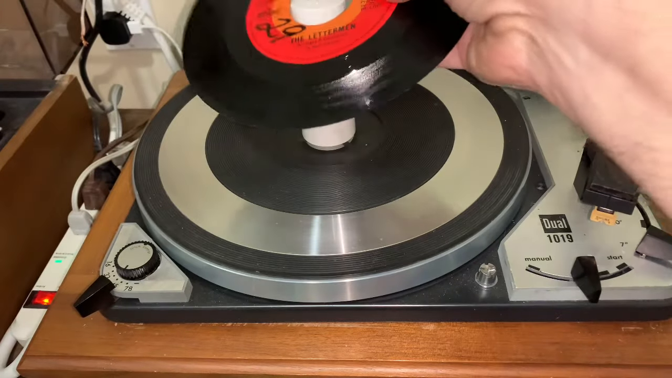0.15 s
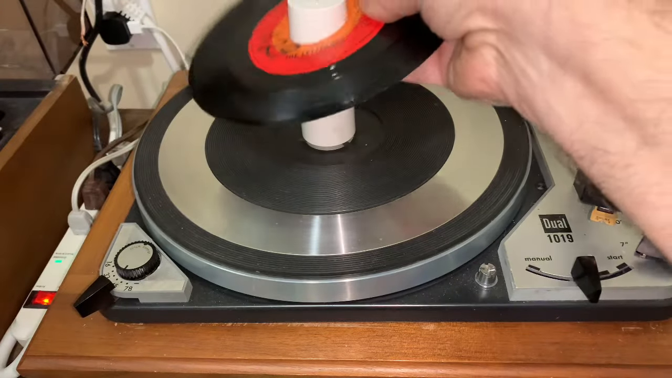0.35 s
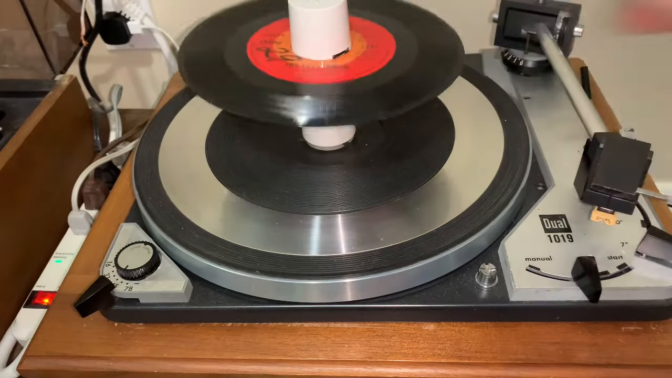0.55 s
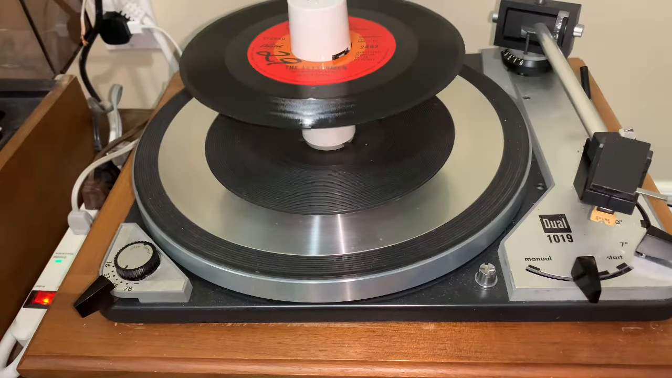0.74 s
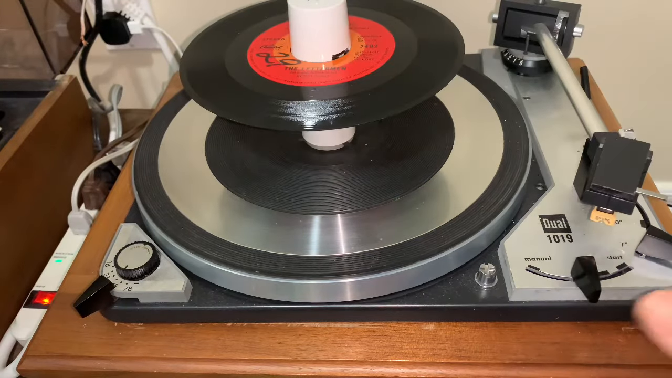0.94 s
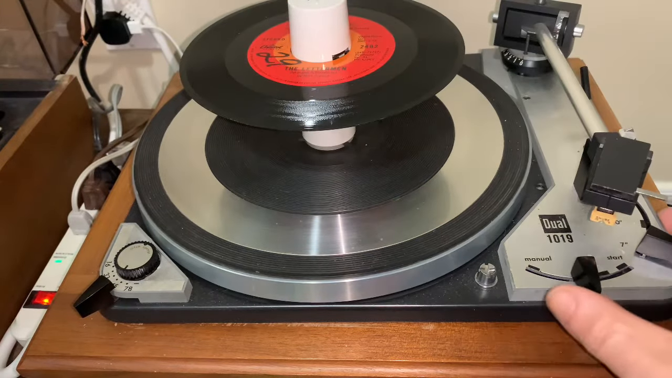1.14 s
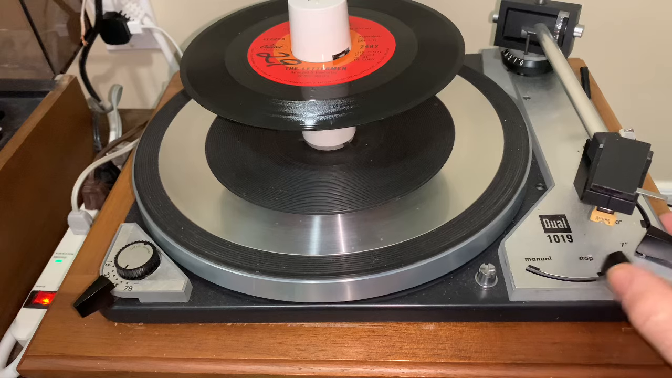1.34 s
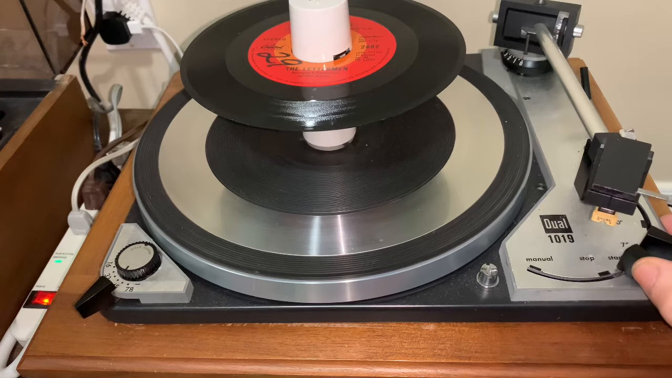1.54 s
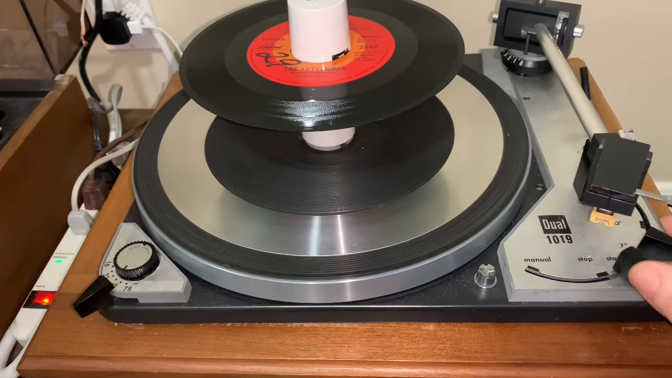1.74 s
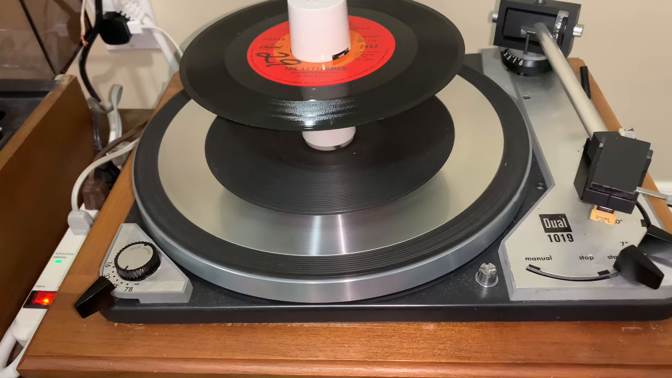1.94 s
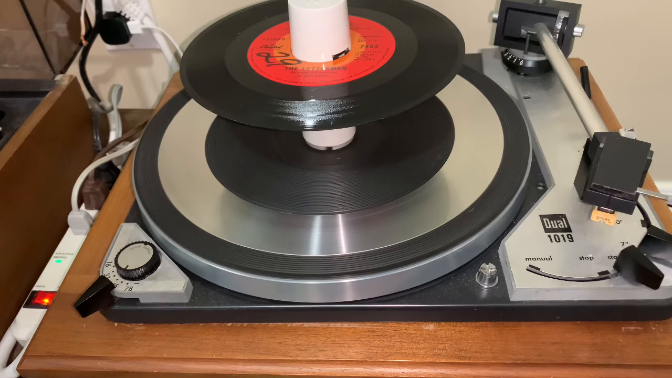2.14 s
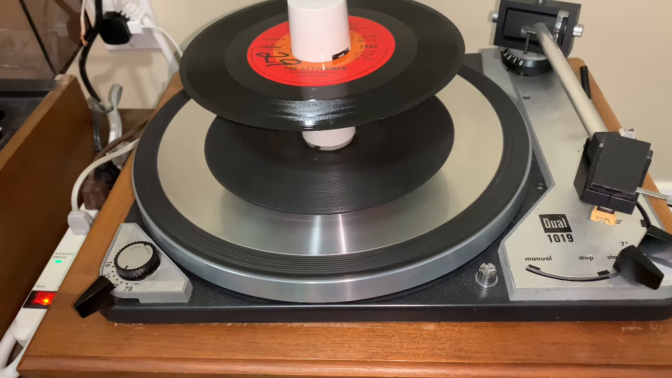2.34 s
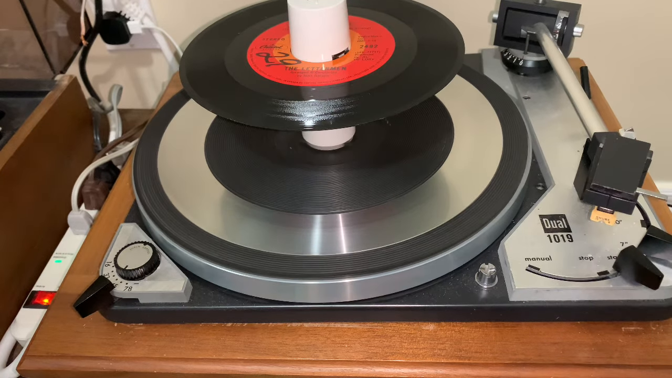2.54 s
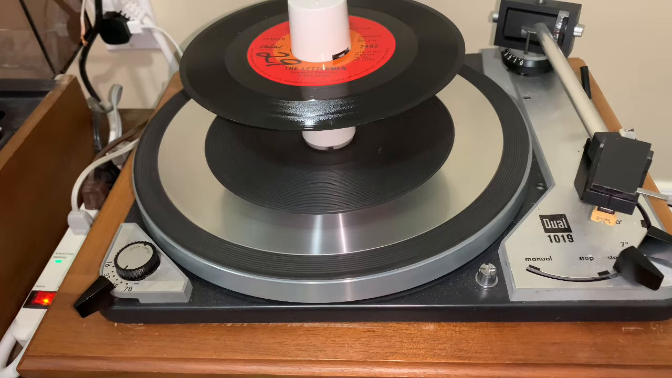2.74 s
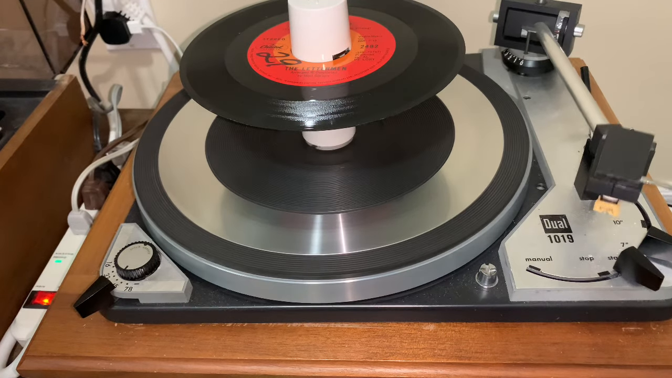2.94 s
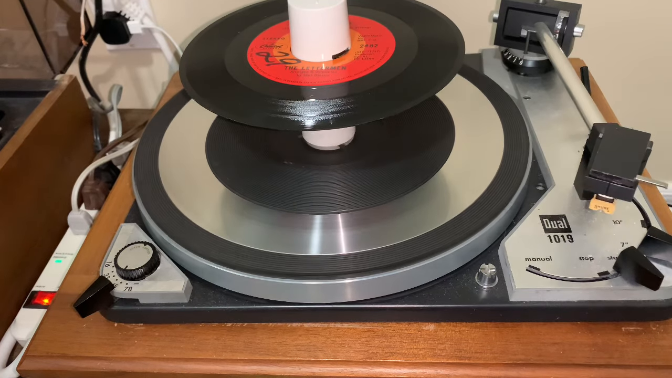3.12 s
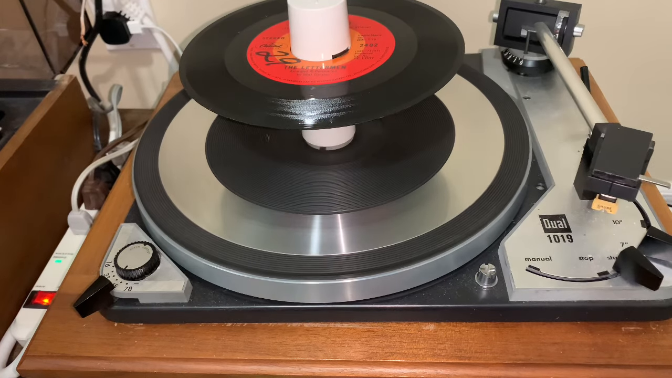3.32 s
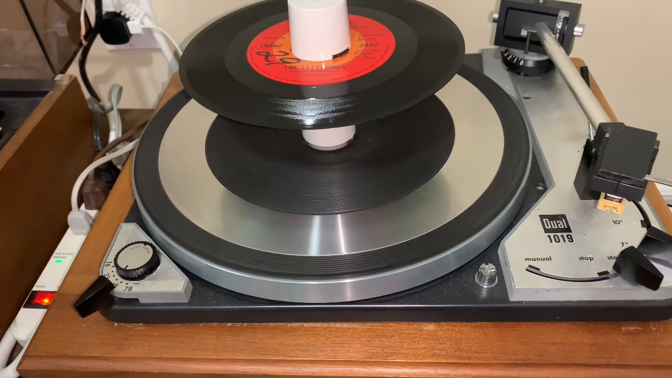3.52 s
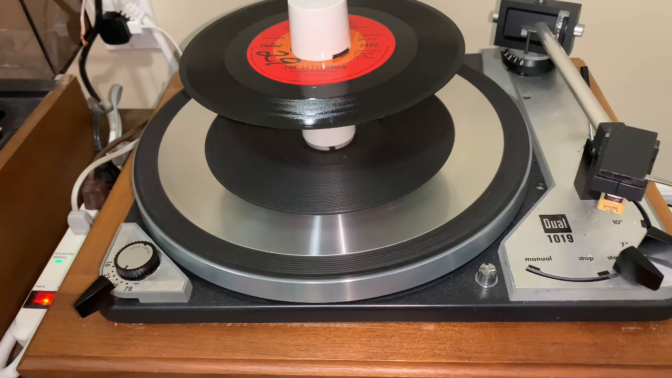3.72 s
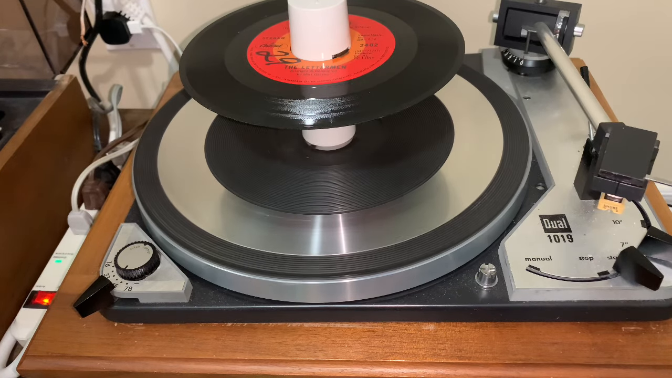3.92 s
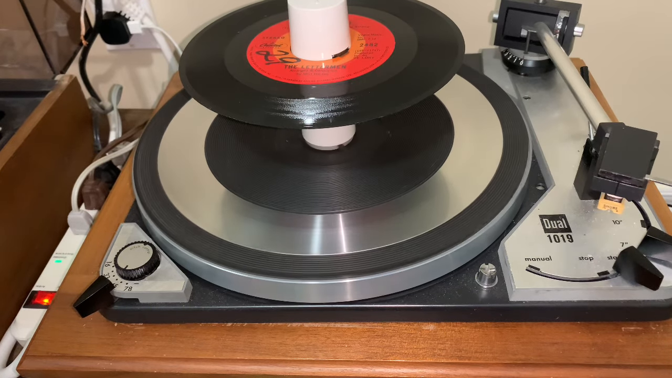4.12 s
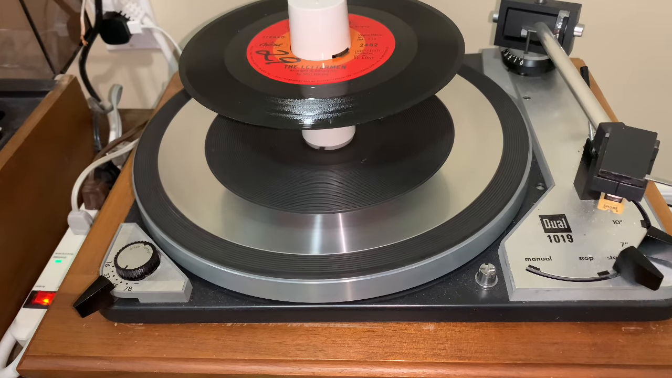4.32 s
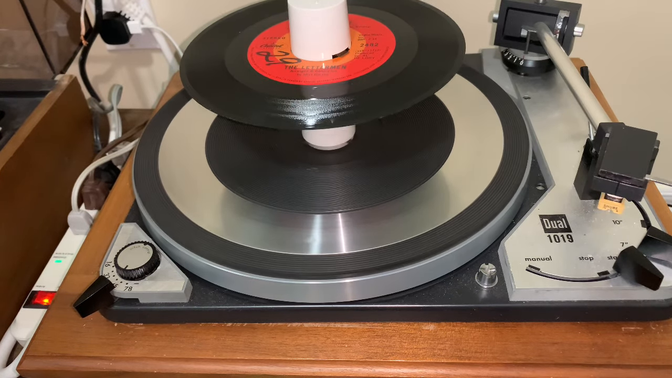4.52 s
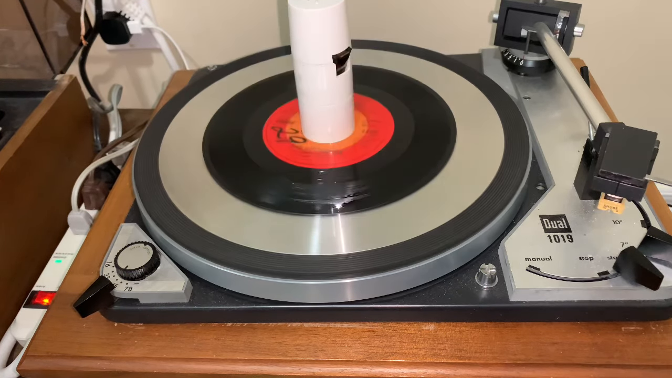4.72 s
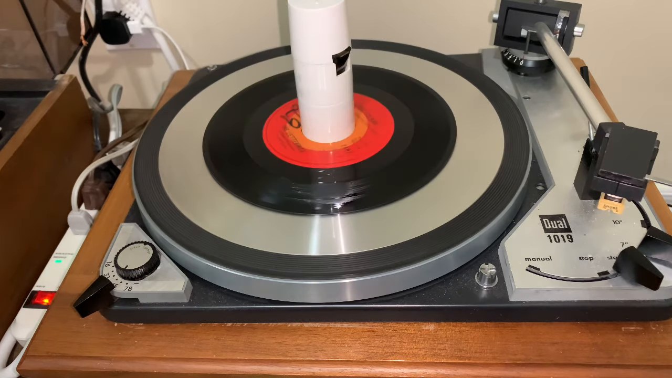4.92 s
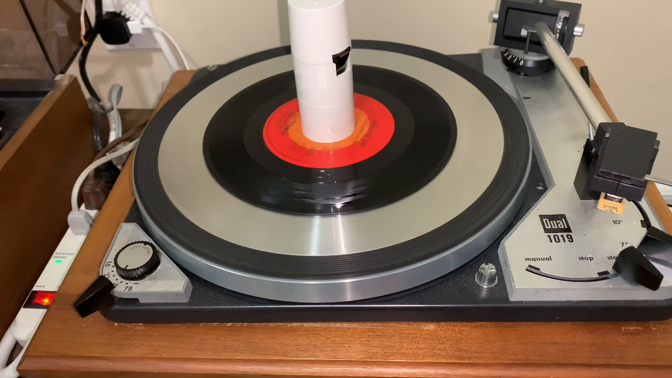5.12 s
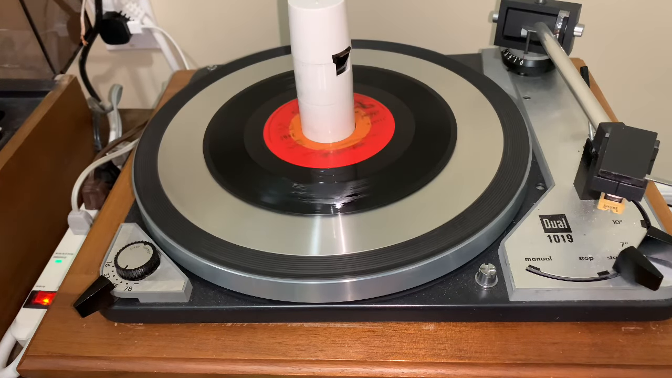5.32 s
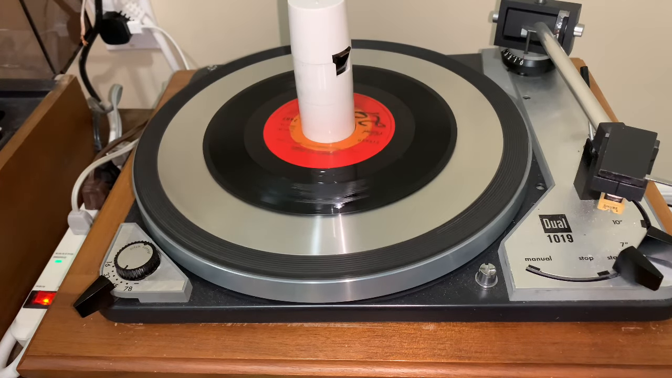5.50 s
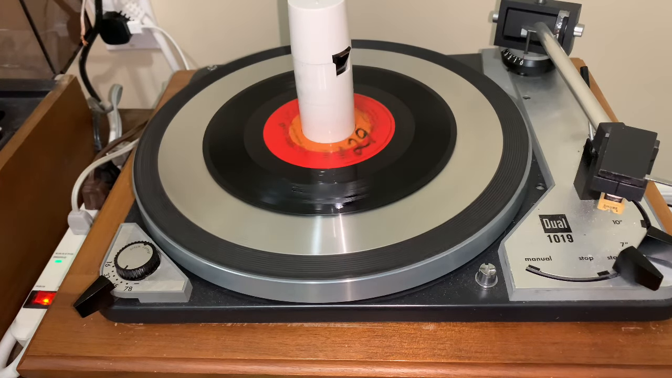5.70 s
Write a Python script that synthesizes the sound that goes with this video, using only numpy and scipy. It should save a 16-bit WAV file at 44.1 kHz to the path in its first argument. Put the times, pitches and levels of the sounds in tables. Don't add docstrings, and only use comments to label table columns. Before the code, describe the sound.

Close up in a small furnished room, a thin vinyl disc taps and wobbles onto a thick spindle with light finger rubbing. A start lever then snaps over with loud, ringing metal clacks. Faint greasy rubbing and small ticks follow until the latch trips sharply and the disc slaps flat onto the platter, rattling the deck. A few faint ticks and a muffled knock end it over low room rumble. Phone stereo microphone.

```python
import sys
import numpy as np
from scipy import signal
from scipy.fft import rfft, irfft, next_fast_len
from scipy.io import wavfile
from scipy.ndimage import uniform_filter1d, map_coordinates

SR = 44100
rng = np.random.default_rng(int(sys.argv[2]) if len(sys.argv) > 2 else 0)


def master(y):
    cut = np.clip(np.atleast_2d(y).T, -1, 1)
    pcm = np.round(cut * 32767)
    wavfile.write(sys.argv[1], SR, pcm.astype(np.int16))


def ratio_of_db(decibels):
    return 10 ** (np.asarray(decibels, float) / 20)


N = 258413
T = np.arange(N) / SR
FAST = next_fast_len(N)

# time_s, level_db
RUMBLE_STRENGTH = [(0.0, -63.5), (0.78, -55), (0.98, -66.5), (1.16, -63), (1.34, -55.5), (1.66, -59.5),
                   (2.15, -64), (3.28, -61), (3.83, -71.5), (4.11, -71), (4.78, -62), (4.99, -58.5),
                   (5.11, -68), (5.24, -56), (5.5, -99), (5.86, -64)]
# pitch_hz, drift_share, level_db (against the rumble), surge_db, surge_rate_hz
RUMBLE_TONES = [
    (65.5, .2, -6, 3.5, 24),
    (116.6, 0.12, -3, 4.5, 14),
    (179.7, .015, -6.5, 2.5, 5.9),
]
# frequency_hz, density_db (per Hz)
AIR_SPECTRUM = [(22, -26), (45, -4.5), (115, -5), (200, -10.5), (290, -23), (1200, -35.5), (7500, -46),
                (10000, -71)]
AIR_DB, HISS_DB = -65, -85.5

# start_s, length_s, pressure_db, drag_db (weight below 2 kHz), skid_db (sheen above 7.5 kHz)
RUB_STROKES = [(-.05, 0.17, -71.5, -6.5, -11), (0.175, 0.24, -69, -2.5, -11.5), (0.317, .2, -70, -3, 8),
               (0.422, 0.34, -76, 14.5, -22), (0.497, 0.18, -71.5, 3, -11.5),
               (2.187, .33, -66.5, -4.5, -12.5), (2.334, 0.49, -78.5, 13.5, -9),
               (2.756, 0.55, -73.5, 1, -1), (3.109, 0.48, -67, -2, -6.5), (3.447, 0.57, -90, 4, -5),
               (4.184, 0.29, -74.5, -11, -23.5), (5.201, 0.22, -93.5, 10, 6.5)]
STROKE_RISE, STROKE_FALL, STROKE_SOFT_DB = 0.39, 0.65, 19.5
# pitch_hz, level_db, t60_s
HELD_DISC = [(761, -6.5, 0.06), (1180, -8.5, 0.27), (1285, -1.5, 0.21), (1529, 5, 0.025), (2600, -3, 0.11)]
HELD_RING_DB, SEATED_S = -25, 1.1

# start_s, length_s, pitch_hz, level_db, scatter_hz
SINGING_PARTS = [(.01, 0.082, 2200, -69, 370), (2.88, 0.046, 1703, -80.5, 3.4),
                 (2.937, 0.12, 362.8, -67.5, 20.4), (3.37, 0.094, 1313, -70, 77),
                 (3.409, 0.18, 414.4, -76.5, 26), (3.649, 0.093, 1316, -67, 11.4),
                 (5.196, 0.17, 4210, -71.5, 540), (.532, 0.041, 684, -51.5, 6.7),
                 (.592, .055, 684, -50, 6.6), (.618, 0.022, 1270, -54, 19), (.302, 0.037, 350, -49.5, 12),
                 (.43, 0.054, 690, -65, 5.8), (.685, 0.041, 670, -58.5, 11.6),
                 (1.461, 0.086, 683, -44.5, 12), (4.354, .14, 1243, -54, 26.8), (4.567, .1, 790, -47, 10),
                 (4.95, .2, 2155, -74.5, 136), (1.793, 0.054, 327.6, -52.5, 65.4)]

# time_s, peak_db (1-3 kHz), thud_db (relative), brightness_db (relative), ring_hz
VINYL_CONTACTS = [(0.1547, -48, 4.5, -2, 264), (0.187, -49.5, 7, -3.5, 252), (0.2647, -71, 20, -24, 376),
                  (0.2823, -55, 1, -5, 393), (0.3022, -51, 8.5, -10, 338), (0.3495, -44.5, -15, -5.5, 1090),
                  (0.4278, -61.5, 1, 2, 694), (0.4673, -50, -5, 3, 1270), (0.4774, -46.5, -1, -1.5, 322),
                  (0.5291, -35.5, -4, -2.5, 680), (0.5875, -42.5, 3.5, 6, 694), (0.619, -45, -3, -27, 1286),
                  (0.6894, -54.5, 1, -29, 665), (0.752, -61.5, 0.5, -17, 364),
                  (0.7991, -69, -3.5, -13, 1270)]
LEVER_CONTACTS = [(1.1975, -58, -12.5, -16, 724.4), (1.2181, -37.5, -21.5, -11.5, 1695),
                  (1.2314, -62, -1.5, -14.5, 678), (1.2674, -59.5, -7.5, 3.5, 1007),
                  (1.3048, -30, -20, -10.5, 2933), (1.3247, -45, 4.5, 4, 658),
                  (1.3563, -13.5, -24.5, -5, 2983), (1.3624, -17.5, -15.5, -5.5, 2600),
                  (1.3825, -28, -9, -7, 2047), (1.4367, -40, -13, 3.5, 2410),
                  (1.4663, -20.5, -16, 0.5, 3497), (1.4773, -15, -20, -8, 664),
                  (1.7509, -25, -17.5, -14, 2418), (1.8044, -62.5, -19, -18, 300),
                  (1.346, -45, -11, -3, 2810),
    (1.457, -43, -11, 1, 3110),
    (1.744, -41, -16, 1, 1610),
    (1.3525, -24, -18, 2, 2400),
]
TRIP_CONTACTS = [
    (4.3605, -32, 5.5, 0, 398.8),
    (4.3668, -39.5, 0.5, -16.5, 646),
    (4.5585, -13.5, -17, -4, 2309),
    (4.5703, -20, -7, -5, 771),
    (4.5992, -25.5, -9, -8, 694),
    (4.6777, -25.5, -11, -9, 438),
    (4.6875, -28.5, -2.5, -7.5, 916),
                 (4.546, -50, -21, -9, 4510),
    (4.5545, -32, -16, 4, 2310),
    (2.266, -63, -16, -2, 1110),
    (3.263, -64, -16, 0, 2010),
]
CAM_TICKS = [(2.3647, -41.5, -7, 6.5, 1320), (2.3726, -44, -4, 4.5, 1050), (2.6703, -50, -10, 4, 2380),
             (2.6784, -47.5, -0.5, 6.5, 1610), (2.9345, -46, -26, -0.5, 2800),
             (2.9385, -45.5, -29, -1.5, 1617), (4.055, -68, -7.5, -10, 1482),
             (4.1455, -65.5, -8.5, 3.5, 2420), (4.2663, -60, -18.5, 3, 2230), (4.354, -24, -10, -5.5, 1480),
             (4.9415, -39.5, -28, 0, 2397), (4.946, -35.5, -23, -0.5, 1720), (5.2617, -64.5, -14, 9, 1704),
             (5.6236, -57, -16, -3.5, 1653)]
CAM_KNOCKS = [
    (2.6334, -49, -2.5, -11, 1220),
    (2.7616, -55, -25, -30, 1054),
    (3.6541, -69, 10.5, 1, 1330),
    (4.3286, -50.5, 3, 6, 1267),
    (4.9514, -52, 8.5, -5.5, 1028),
    (5.7134, -71, 5, -22, 1329),
    (5.7972, -43, -11.5, -46, 771),
    (5.8144, -55, 3, -35, 1100),
    (5.8294, -69.5, 7, -26, 711),
]
DROP_BOUNCES = [
    (4.6715, -24, -1.5, 4, 950),
    (4.6735, -29, -4, 3.5, 2240),
    (4.6765, -25.5, -6, 2.5, 1920),
    (4.6785, -17.5, -9.5, 2.5, 2040),
    (4.6845, -21, -4, -1.5, 1180),
    (4.69, -24.5, -2.5, 1, 500),
    (4.6955, -25.5, -5, 1, 1560),
    (4.705, -30, -13.5, -2, 2485),
]
SNAP_S, SNAP_DB, SNAP_LEN_S = 4.6786, -10.5, .00006
MAT_HOLE_HZ = 3000
TOP_FOLLOWS = 1
# time_s, level_db
PLATTER_BLOWS = [
    (4.675, -39),
    (4.679, -25),
    (4.686, -38),
]

# pitch_hz, level_db, t60_s
VINYL_MODES = [(230, 4, .1), (300, -1, .08), (360, -1, .07), (415, -12, .1), (684, 0, .14), (1100, -6, .08),
               (1180, -5, .12), (1280, -3, .2), (1450, -7, .08), (2500, -12, .05), (3680, -10, .08),
               (6300, -5, .07), (6900, -6, .05)]
# pitch_hz, level_db, t60_s
LEVER_MODES = [(330, -10, .12), (412, -11, .2), (675, 2, .18), (788, -3, .15), (1050, -7, .12),
               (1650, -5, .12), (2061, -9, .12), (2830, -6, .12), (3415, -4, .15), (3700, -7, .1),
               (4500, -8, .08), (5310, -4, .14), (6820, -8, .08), (10970, -6, .08)]
# pitch_hz, level_db, t60_s
CAM_MODES = [(415, -5, .25), (789, 2, .18), (922, -4, .18), (1050, -5, .15), (1180, -3, .18),
             (1316, -4, .18), (1685, -3, .12), (2100, -1, .13), (2360, -3, .13), (3470, -5, .1),
             (3800, -4, .08), (4370, -2, .07), (5080, -5, .1), (6500, -6, .07)]
# pitch_hz, level_db, t60_s
PLATTER_MODES = [(60.7, -8.5, 0.13), (89.3, 7, 0.09), (117.5, -6.5, 0.047), (193.4, 1.5, 0.15),
                 (257, -10, 0.076), (416, 6.5, 0.11), (496.4, 9, 0.046)]
# pitch_hz, level_db, t60_s
SHEEN_MODES = [(8800, -4, 0.35), (9855, -6.5, 0.08), (11080, -2.5, 0.077), (12300, -5, 0.17),
               (13900, -7.5, .12), (14800, -3.5, .15), (15290, -2.5, .12)]
LEVER_BODY_DB, CAM_BODY_DB, SHEEN_DB = -31, -33.5, -35.5

# frequency_hz, t60_s
CLATTER_DECAY = [(200, 0.66), (500, 0.083), (1200, 0.086), (3000, 0.26), (6000, .2), (9000, .2),
                 (14000, 0.12)]
# frequency_hz, t60_s
ROOM_DECAY = [(200, 0.82), (500, 0.5), (1200, 0.76), (3000, 0.63), (6000, 0.53), (10000, 0.18),
              (15000, 0.4)]
SWAY_S = .00009

# frequency_hz, likeness (0-1)
PORT_ALIKE = [(100, 0.87), (400, 0.8), (800, 0.07), (1500, 0.5), (3000, 0.2), (5500, 0), (6800, .75),
              (9000, 0.89)]
# frequency_hz, left_minus_right_db
PORT_LEAN = [(300, 0), (1200, 2.5), (2500, 1), (5000, -3.5), (7000, -2), (9000, 0)]
# frequency_hz, level_db
CAPSULE_COLOUR = [(2000, 0.5), (4200, 4), (6300, 2), (7800, -1.5), (9500, 4.5), (12500, -1.5),
                  (15700, -4.5), (16300, -17.5)]
PORT_TURN_HZ, PORT_ALIGNED_HZ, TOP_HZ = 4700, 11000, 16450


def on_log(table, hz):
    points_hz, values = np.transpose(table)
    return np.interp(np.log(hz + 1), np.log(points_hz), values)


def band(x, lo_hz, hi_hz):
    sos = signal.butter(4, [lo_hz, min(hi_hz, .45 * SR)], "bandpass", fs=SR, output="sos")
    return signal.sosfilt(sos, x) * np.sqrt(SR / 2 / (hi_hz - lo_hz))


def walk(rate_hz):
    step = int(SR / rate_hz)
    held = np.repeat(rng.standard_normal(N // step + 1), step)
    return 1.3 * uniform_filter1d(uniform_filter1d(held, step), step)[:N]


def ring(x, modes, rough):
    out, waver = 0, walk(190)
    for k, (hz, db, t60) in enumerate(modes):
        radius = np.exp(-np.log(1000) / (np.clip(.65 * t60, .01, .35) * SR))
        w = 2 * np.pi * hz / SR
        mode = np.sin(w) * signal.lfilter([1], [1, -2 * radius * np.cos(w), radius * radius], x)
        own_waver = np.roll(waver, k * SR // 3)[:x.shape[-1]]
        out = out + ratio_of_db(db) * mode * (1 - rough + rough * own_waver)
    return out


def tail(t60_table, onset_s):
    t = T[:SR]
    hz = np.fft.rfftfreq(SR, 1 / SR)
    noise, out = rfft(rng.standard_normal((2, SR))), 0
    for centre_hz in 60 * 2 ** np.arange(0, 8.6, .5):
        share = np.clip(1 - 2 * np.abs(np.log2((hz + 1) / centre_hz)), 0, 1)
        out = out + irfft(noise * share) * ratio_of_db(-60 * t / on_log(t60_table, centre_hz))
    out = out * (1 - np.exp(-t / onset_s))
    return out / np.sqrt(np.sum(out ** 2, axis=1, keepdims=True))


def contacts(hits, modes, reach_hz, rise_s, fall_s, body_db, note_db, note_t60, top_db):
    size = SR // 8
    start = int((min(hits)[0] - .02) * SR)
    span = min(int(max(hits)[0] * SR) + SR // 2, N) - start
    t = T[:size]
    slow = np.array([1.4, 0.99, 1.0, 0.66])[:, None, None]
    build = np.minimum(t / (rise_s * slow), 1) ** 2
    shape = build * np.exp(-np.maximum(t / slow - rise_s, 0) / fall_s)
    shape_energy = np.sum(shape ** 2, axis=2)
    parts, notes = np.zeros((4, 2, span + size)), np.zeros((2, span + size))
    for s, db, thud_db, bright_db, hz in hits:
        i = int((s - rise_s / 2) * SR) - start
        grit, uneven, jitter = rng.standard_normal((3, 2, size))
        rattle = shape * grit * ratio_of_db(10 * uniform_filter1d(uneven[0], size=9))
        rattle *= np.sqrt(shape_energy / np.sum(rattle ** 2, axis=2))[:, :, None]
        levels = db + np.array([thud_db, 0, bright_db, top_db + TOP_FOLLOWS * bright_db])
        parts[:, :, i:i + size] += ratio_of_db(levels)[:, None, None] * rattle
        phase = 2 * np.pi * hz * t + (hz / 6000) ** 1.5 * np.cumsum(jitter, axis=1)
        fade = ratio_of_db(db + thud_db * (hz < 1000) + note_db - 60 * t / note_t60)
        notes[:, i:i + size] += fade * np.sin(phase) * np.minimum(t / rise_s, 1)
    edges = [(reach_hz[0], 1000), (1000, reach_hz[1]), (reach_hz[1], 7500), (7500, 16500)]
    crack = 0
    for part, (lo_hz, hi_hz), db in zip(parts, edges, (-8.5, -10.5, -5.0, 5.0)):
        crack = crack + ratio_of_db(db) * band(part[:, :span], lo_hz, hi_hz)
    out = np.zeros((2, N))
    out[:, start:start + span] = crack + ratio_of_db(body_db) * ring(crack, modes, rough=0.66) + notes[:, :span]
    return out


def house():
    strength_db = np.interp(T, *np.transpose(RUMBLE_STRENGTH))
    hum = 0
    for hz, drift, db, surge_db, rate_hz in RUMBLE_TONES:
        pitch = hz * (1 + drift * np.array([walk(8.2), walk(7)]))
        gain = ratio_of_db(strength_db + db + surge_db * walk(rate_hz) + 4.5 * walk(30))
        hum = hum + gain * np.sin(2 * np.pi * np.cumsum(pitch, axis=1) / SR)
    colour = ratio_of_db(on_log(AIR_SPECTRUM, np.fft.rfftfreq(FAST, 1 / SR)))
    air = irfft(rfft(rng.standard_normal((2, FAST))) * colour, FAST)[:, :N]
    hiss = band(rng.standard_normal((2, N)), 7000, 16000)
    return hum + ratio_of_db(AIR_DB + 2.7 * walk(4.3)) * air / air.std() + ratio_of_db(HISS_DB) * hiss


def rubbing():
    out = np.zeros((2, N))
    grains = rng.standard_normal((2, N)) * ratio_of_db(1.8 * walk(300) + 1.2 * walk(30))
    body = band(grains, 2400, 7300)
    drag = band(grains, 450, 2400)
    skid = band(grains, 7500, 16500)
    for s, length, db, drag_db, skid_db in RUB_STROKES:
        on = slice(max(int(s * SR), 0), int((s + length) * SR))
        at = (T[on] - s) / length
        press = np.clip(np.minimum(at / STROKE_RISE, (1 - at) / STROKE_FALL), 0, 1)
        gain = ratio_of_db(db - STROKE_SOFT_DB * (1 - press) ** 2) * np.minimum(10 * press, 1)
        out[:, on] += gain * (body[:, on] + ratio_of_db(drag_db) * drag[:, on] + ratio_of_db(skid_db) * skid[:, on])
    out = out * ratio_of_db(3.1 * walk(9))
    early = int(SEATED_S * SR)
    out[:, :early] += ratio_of_db(HELD_RING_DB) * ring(out[:, :early], HELD_DISC, rough=0.48)
    return out


def springs():
    out, shiver = 0, np.array([walk(630), walk(1000)])
    for s, length, hz, db, scatter_hz in SINGING_PARTS:
        speak = np.clip((T - s) / (0.00089 + scatter_hz / 6900.0), 0, 1)
        damp = np.clip((s + length - T) / 0.052, 0, 1)
        phase = 2 * np.pi * np.cumsum(hz + scatter_hz * shiver, axis=1) / SR
        level_db = db + 8.5 - 45 * np.clip(T - s, 0, 1) + scatter_hz / 300 * shiver[::-1]
        out = out + ratio_of_db(level_db) * speak * damp * np.sin(phase)
    return out


def vinyl_knocks():
    return contacts(VINYL_CONTACTS, VINYL_MODES, (300, 1700), rise_s=0.0019, fall_s=0.0041,
                    body_db=-25.5, note_db=-2.5, note_t60=0.066, top_db=-6.0)


def clatter_and_room(shaken, vinyl):
    clatter = signal.fftconvolve(shaken, tail(CLATTER_DECAY, 0.0054), axes=1)[:, :N]
    room = signal.fftconvolve(shaken + 0.38 * vinyl, tail(ROOM_DECAY, 0.0036), axes=1)[:, :N]
    late = (T + SWAY_S * walk(40)) * SR
    tails = ratio_of_db(-7) * clatter + ratio_of_db(-9.5) * room
    return np.array([map_coordinates(x, [late], mode="nearest") for x in tails])


def lever_throw():
    return contacts(LEVER_CONTACTS, LEVER_MODES, (280, 3000), rise_s=.005, fall_s=0.0058,
                    body_db=LEVER_BODY_DB, note_db=-2.0, note_t60=0.039, top_db=-5.0)


def deck_sheen(deck):
    return ratio_of_db(SHEEN_DB) * ring(deck, SHEEN_MODES, rough=0.73)


def cam_trips():
    return contacts(TRIP_CONTACTS, CAM_MODES, (320, 2800), rise_s=.003, fall_s=0.0028,
                    body_db=CAM_BODY_DB, note_db=-5.5, note_t60=0.037, top_db=-5.5)


def cam_ticks():
    return contacts(CAM_TICKS, CAM_MODES, (300, 2800), rise_s=.0015, fall_s=0.0018,
                    body_db=CAM_BODY_DB, note_db=1, note_t60=0.024, top_db=-11.0)


def cam_knocks():
    return contacts(CAM_KNOCKS, CAM_MODES, (550, 2600), rise_s=0.0016, fall_s=0.0024,
                    body_db=CAM_BODY_DB, note_db=4.5, note_t60=0.06, top_db=-20.0)


def disc_drop():
    drop = contacts(DROP_BOUNCES, CAM_MODES, (320, 2800), rise_s=.0006, fall_s=0.00082,
                    body_db=CAM_BODY_DB, note_db=-10, note_t60=.025, top_db=-5)
    drop = drop - 0.6 * signal.lfilter(*signal.iirpeak(MAT_HOLE_HZ, 3, fs=SR), drop)
    return drop - ratio_of_db(SNAP_DB) * np.exp(-((T - SNAP_S) / SNAP_LEN_S) ** 2)


def platter_thump():
    push = np.zeros(N)
    puff = np.hanning(int(0.0022 * SR))
    for s, db in PLATTER_BLOWS:
        i = int(s * SR)
        push[i:i + len(puff)] += ratio_of_db(db) * puff / puff.sum()
    thump = ring(push, PLATTER_MODES, rough=0.32)
    thump = signal.sosfilt(signal.butter(2, 60, "highpass", fs=SR, output="sos"), thump)
    return np.array([thump, np.roll(thump, SR // 300)])


def scene():
    vinyl, notes, thump = vinyl_knocks(), springs(), platter_thump()
    deck = lever_throw() + cam_trips() + cam_ticks() + cam_knocks() + disc_drop()
    deck = deck + deck_sheen(deck)
    shaken = deck + ratio_of_db(-6.5) * vinyl + ratio_of_db(-22.0) * thump + ratio_of_db(-11.5) * notes
    tails = clatter_and_room(shaken, vinyl)
    return deck + vinyl + thump + notes + tails + rubbing() + house()


def low_pass(x):
    return signal.sosfilt(signal.butter(12, 17160, fs=SR, output="sos"), x)


def record(dry):
    hz = np.fft.rfftfreq(FAST, 1 / SR)
    left, other = rfft(dry, FAST)
    alike = np.clip(on_log(PORT_ALIKE, hz), 0, 1)
    turned = hz > PORT_ALIGNED_HZ - 2 * PORT_TURN_HZ
    turn = 2 * np.pi * (hz - PORT_ALIGNED_HZ) / PORT_TURN_HZ * turned
    right = alike * left * np.exp(1j * turn) + np.sqrt(1 - alike ** 2) * other
    lean = ratio_of_db(on_log(PORT_LEAN, hz) / 2)
    colour = ratio_of_db(on_log(CAPSULE_COLOUR, hz)) * (hz < TOP_HZ)
    both = irfft(np.array([left * lean, right / lean]) * colour, FAST)[:, :N]
    both = signal.sosfilt(signal.butter(3, 50, "highpass", fs=SR, output="sos"), both)
    return low_pass(both)


dry = scene()
out = record(dry)
master(out)
```